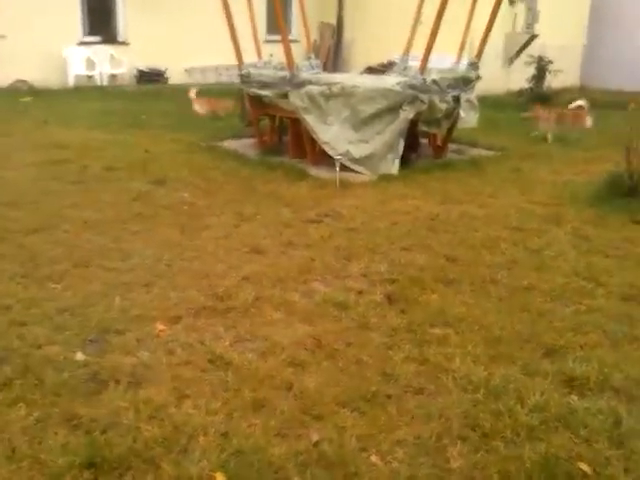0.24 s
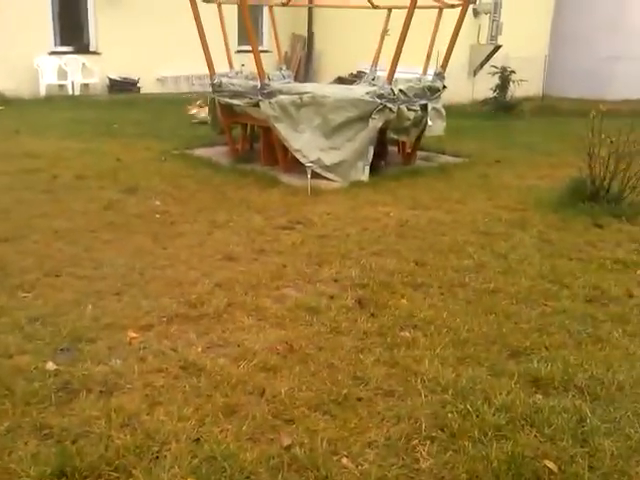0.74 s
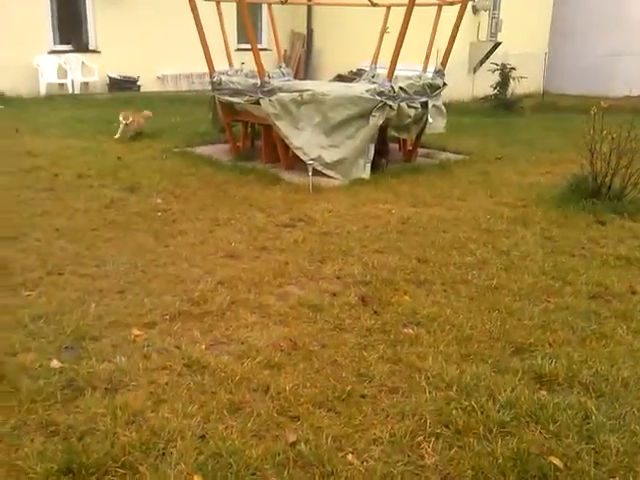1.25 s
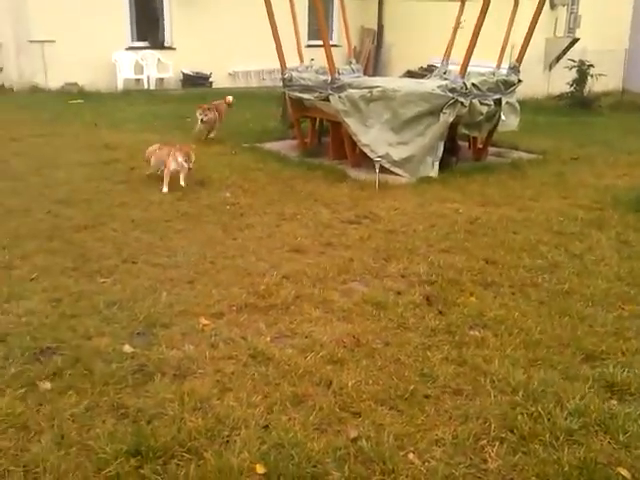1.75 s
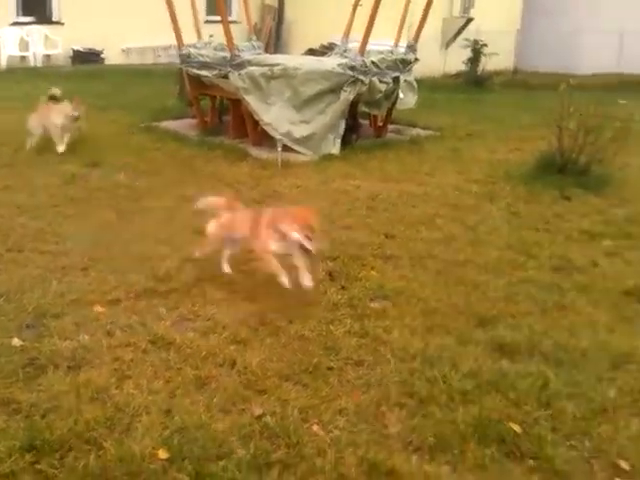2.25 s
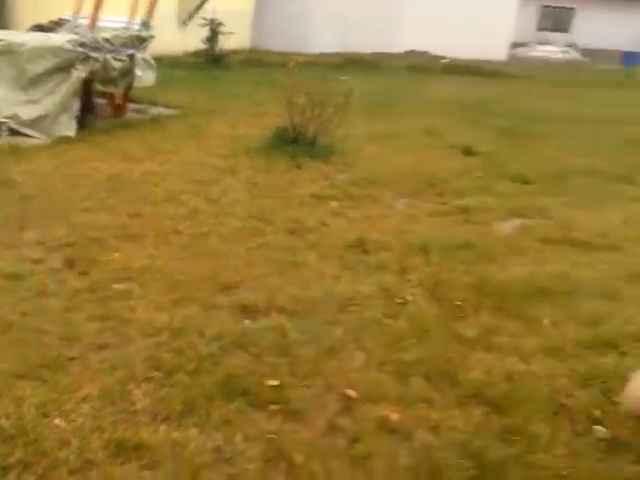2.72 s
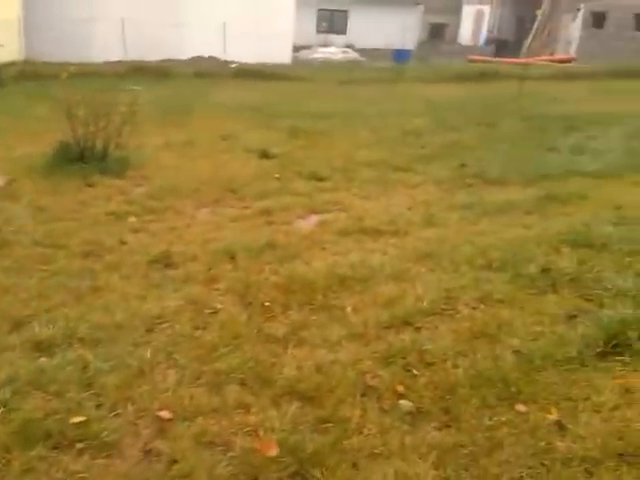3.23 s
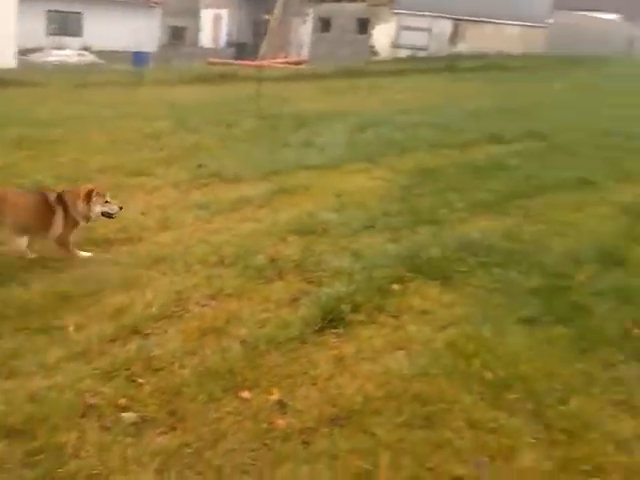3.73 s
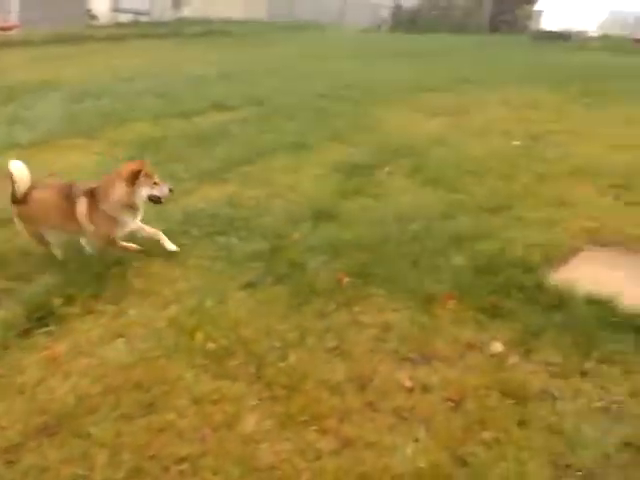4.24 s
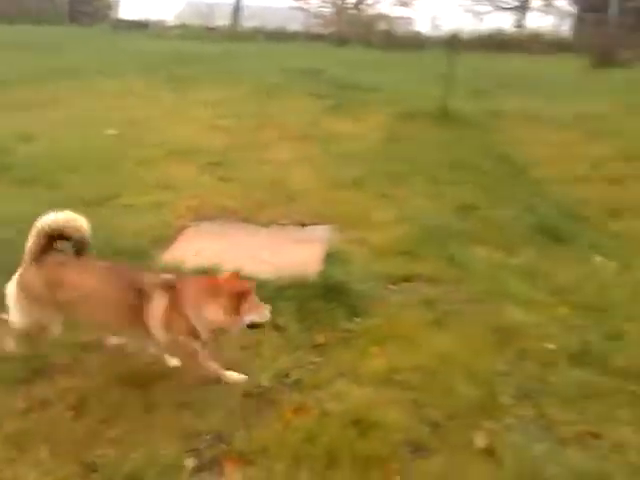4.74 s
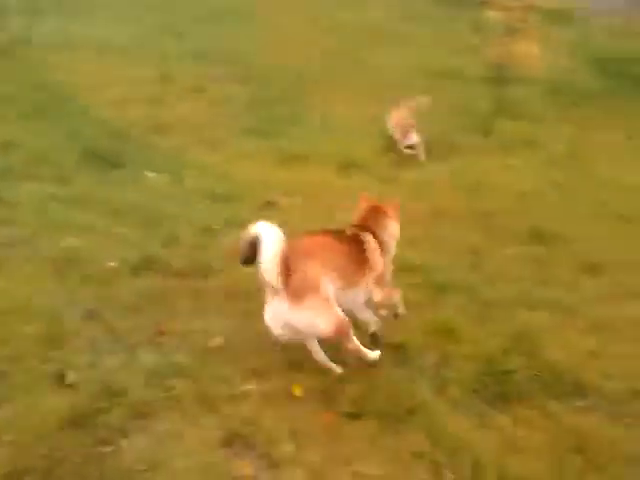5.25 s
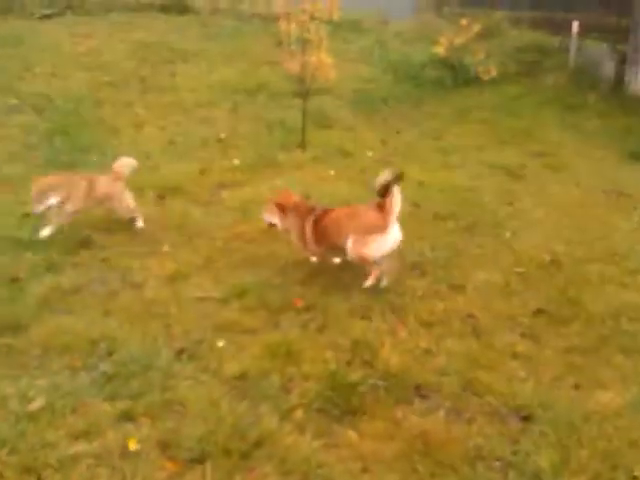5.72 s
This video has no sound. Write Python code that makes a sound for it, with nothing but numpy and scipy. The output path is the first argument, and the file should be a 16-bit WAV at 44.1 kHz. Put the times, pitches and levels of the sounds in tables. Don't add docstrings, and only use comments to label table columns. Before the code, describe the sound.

Two dogs race over a wet lawn, paws and legs crackling through grass with sharp snaps, soft thuds and panting, growing closer and busier.

```python
import sys
import numpy as np
from scipy import signal
from scipy.fft import rfft, irfft
from scipy.io import wavfile
from scipy.ndimage import uniform_filter1d

SR = 44100
rng = np.random.default_rng(int(sys.argv[2]) if len(sys.argv) > 2 else 0)


def file_out(sig):
    cols = np.atleast_2d(sig).T
    lim = np.clip(cols, -1, 1)
    pcm = np.round(lim * 32767).astype(np.int16)
    wavfile.write(sys.argv[1], SR, pcm)


def magnitude_from_level(level_db):
    exponent = np.asarray(level_db, float) / 20
    return 10 ** exponent


N = 263718


def evened(x):
    return x / np.sqrt(np.mean(x ** 2) + 1e-20)


def coloured(x, points):
    table_hz, table_db = np.transpose(points)
    hz = np.fft.rfftfreq(len(x), 1 / SR)
    gain = magnitude_from_level(np.interp(np.log(hz + 1), np.log(table_hz + 1), table_db))
    return evened(irfft(rfft(x) * gain, len(x)))


def curves(rows):
    s, *columns = np.transpose(rows)
    return [np.interp(np.arange(N) / SR, s, column) for column in columns]


def swells(rest_db, rows):
    t = np.arange(0, N, 44) / SR
    power = np.zeros(len(t))
    for peak_s, db, rise, fall in rows:
        away = np.maximum((peak_s - t) / rise, (t - peak_s) / fall)
        power += magnitude_from_level(2 * (db - 10 * away ** 1.5))
    return 10 * np.log10(magnitude_from_level(2 * rest_db) + np.interp(np.arange(N) / SR, t, power))


def resonate(x, hz, width):
    turn = np.exp(2j * np.pi * np.cumsum(hz * np.ones(len(x))) / SR)
    r = np.exp(-np.pi * width / SR)
    return 2 * (turn * signal.lfilter([1 - r], [1, -r], x / turn)).real


def resonate_twice(x, hz, width):
    return evened(resonate(resonate(x, hz, width), hz, width))


def drift(seconds):
    size = max(int(seconds * SR), 2)
    return evened(uniform_filter1d(uniform_filter1d(rng.standard_normal(N), size), size))


def crackle(per_s, spread_db, clump_db, hiss):
    size = magnitude_from_level(spread_db * np.minimum(rng.exponential(1, N), 4))
    size = size * (rng.random(N) < per_s / SR)
    breaks = evened(size * rng.choice([-1., 1.], N))
    return (breaks + hiss * rng.standard_normal(N)) * magnitude_from_level(clump_db * drift(.006))


def patchy(x, db, bins, frames):
    z = signal.stft(x, nperseg=256, noverlap=192)[2]
    field = rng.standard_normal(z.shape)
    field = uniform_filter1d(uniform_filter1d(field, bins, axis=0), frames, axis=1)
    return evened(signal.istft(z * magnitude_from_level(db * evened(field)), nperseg=256, noverlap=192)[1][:N])


def add(mix, s, sound):
    part = mix[max(round(s * SR), 0):][:len(sound)]
    part += sound[:len(part)]


# time_s, level_db
NEAR = [(0.0, -73.5), (0.06, -79.5), (0.66, -81), (0.8, -75.5), (1.3, -73.9), (1.75, -70.8), (2.39, -73.9),
        (2.5, -63.0), (3.25, -72.3), (4.2, -68.6), (4.8, -67.0), (5.03, -74.3), (5.98, -70.0)]
# peak_s, level_db, rise_10db_s, fall_10db_s,
# tips_db
SWEEPS = [(0.03, -67, 0.012, 0.012, -1), (0.772, -68.7, 0.1, 0.023, 1.7), (1.416, -66.5, 0.102, 0.07, -0.8),
          (1.534, -61.5, 0.016, 0.008, 4.9), (1.63, -58.2, 0.037, 0.023, 4.1),
          (1.88, -58.5, 0.045, 0.04, -3.5), (1.965, -67, 0.03, 0.02, -3), (2.026, -69.3, 0.012, 0.044, -6.4),
          (2.153, -54.0, 0.042, 0.026, -4.6), (2.228, -64.3, 0.015, 0.018, -9.0),
          (2.456, -59.5, 0.01, 0.012, 1.5), (2.487, -54.6, 0.024, 0.01, 1.9),
          (2.642, -52.4, 0.07, 0.06, -1.5), (2.754, -62.5, 0.089, 0.022, 4.2),
          (2.835, -64.9, 0.015, 0.09, 1.6), (2.905, -58, 0.012, 0.025, -3.1),
          (2.996, -64.2, 0.115, 0.182, 3.9), (3.134, -56.7, 0.164, 0.025, -9.0),
          (3.372, -60, 0.045, 0.088, -1.5), (3.412, -68, 0.3, 0.3, -1.5), (3.497, -61.9, 0.029, 0.012, 1.6),
          (3.688, -62.8, 0.061, 0.014, -2.3), (3.77, -65.5, 0.04, 0.025, 1.5),
          (3.827, -62.4, 0.034, 0.024, -2.7),
          (4.011, -63.3, 0.092, 0.163, -0.9), (4.29, -62, 0.098, 0.026, -1.2),
         (4.342, -56, 0.014, 0.03, -7.4), (4.5, -60.7, 0.023, 0.06, -3.7),
         (4.598, -56.0, 0.033, 0.022, -4.3), (4.684, -55.7, 0.068, 0.012, -1.8),
         (4.736, -59.8, 0.017, 0.017, -1.5), (4.856, -56.1, 0.023, 0.15, -1.0),
         (4.914, -50, 0.03, 0.018, -8), (5.07, -48, 0.022, 0.085, -3.1), (5.165, -53.5, 0.06, 0.085, -1),
         (5.296, -53.5, 0.032, 0.033, 2.5), (5.343, -56, 0.007, 0.012, 1.5), (5.395, -55, 0.015, 0.093, -5),
         (5.468, -52.8, 0.069, 0.027, 0.8), (5.54, -57.5, 0.025, 0.012, -1),
         (5.605, -55.0, 0.126, 0.048, 1.5), (5.722, -53, 0.05, 0.09, -5.3), (5.84, -60, 0.05, 0.02, 0.5),
         (5.884, -48.5, 0.006, 0.03, -7.5), (5.976, -55, 0.015, 0.05, -3.4),
          (1.432, -64, .02, .015, -2), (2.709, -63, .015, .015, 5), (2.958, -62, .012, .01, -8),
          (3.053, -64, .012, .012, 5), (3.302, -63, .012, .012, 2), (3.352, -58, .03, .015, -5),
          (3.956, -61, .015, .015, -5), (3.545, -66, .02, .02, -3), (4.151, -68, .012, .012, 5),
          (5.69, -53, .005, .018, -4), (4.262, -66, .025, .015, 4), (4.365, -55, .012, .015, -8),
          (4.405, -59, .03, .008, 1), (4.49, -58, .008, .015, -4), (4.54, -67, .012, .012, 3),
          (4.719, -62, .01, .01, -5), (4.836, -60, .008, .015, -6), (4.888, -56, .012, .015, 1),
          (4.932, -53, .01, .012, 1), (4.984, -58, .008, .02, 4), (5.313, -52, .015, .015, -1),
          (5.36, -58, .012, .006, 0.5), (5.493, -58, .015, .012, 3), (5.675, -54.5, .04, .01, -2),
          (5.742, -53, .015, .015, -2), (5.827, -57, .015, .015, -3), (5.857, -59, .012, .012, -3),
          (5.905, -52.5, .012, .035, -4.5), (5.425, -55, .02, .02, -3), (5.225, -60, .02, .012, 4)]


def leg_sweeps():
    sweeps = SWEEPS
    rest_db = curves(NEAR)[0]
    blades_db = swells(rest_db, [row[:4] for row in sweeps])
    tip_rows = [(s, db + tips_db, rise, fall) for s, db, rise, fall, tips_db in sweeps]
    return blades_db, swells(rest_db + 1.0, tip_rows)


# freq_hz, density_db
BLADES = [(300, -28), (1300, -12), (2300, -11), (3200, -10), (4000, -10), (6200, -11), (16000, -32)]
# freq_hz, density_db
TIPS = [(4000, -31), (6100, -13), (7200, -5), (8500, -11.5), (11000, -26), (16000, -44)]


def grass(blades_db, tips_db):
    blades = coloured(crackle(per_s=2200, spread_db=1.8, clump_db=2.0, hiss=0.7), BLADES)
    port = magnitude_from_level(19.3) * resonate(blades, hz=5080, width=540)
    blades = patchy(blades + port, db=1.9, bins=5, frames=24)
    tips = coloured(crackle(per_s=1000, spread_db=2.3, clump_db=2.4, hiss=0.6), TIPS)
    tips = patchy(tips, db=1.4, bins=7, frames=16)
    return magnitude_from_level(blades_db + 2.0) * blades + magnitude_from_level(tips_db + 0.5) * tips


# freq_hz, density_db
SOIL = [(30, -19), (90, -3.5), (200, -2), (320, 1.5), (450, -4.5), (800, -3.5), (1500, -35.5)]
# peak_s, level_db
GUSTS = [(0.0, -68), (.33, -65), (.65, -70), (1.0, -68), (1.55, -67), (1.8, -68), (2.15, -61), (2.48, -62),
         (2.9, -66), (3.3, -65), (3.58, -63), (3.9, -63), (4.86, -66), (5.13, -63), (5.5, -67), (5.9, -67)]


def ground(blades_db):
    stride_s, usual_sweep_db = .11, -62
    effort_db = uniform_filter1d(blades_db, int(stride_s * SR)) - usual_sweep_db
    weight_db = -67.7 + .45 * effort_db
    sod = coloured(crackle(per_s=400, spread_db=1.5, clump_db=1.3, hiss=1.5), SOIL)
    calm_db, gust_s = -80, .16
    buffet_db = swells(calm_db, [(s, db, gust_s, gust_s) for s, db in GUSTS])
    buffet = resonate_twice(rng.standard_normal(N), hz=55, width=60)
    return magnitude_from_level(weight_db) * sod + magnitude_from_level(buffet_db - 1.0) * buffet


# time_s, scuff_db, spray_db
SCUFF = [(0.0, -84, -86), (1.2, -80, -86), (1.42, -67, -84), (2.0, -69.5, -84), (2.3, -70, -84),
         (2.47, -67, -70), (2.64, -61.5, -74), (2.8, -72, -72), (2.95, -65.5, -68), (3.1, -73, -76),
         (3.85, -67, -82), (4.1, -74, -84), (4.7, -72, -80), (5.1, -64, -68), (5.24, -74, -80),
         (5.3, -80, -66), (5.65, -67, -70), (5.98, -67, -78)]
# freq_hz, density_db
PADS = [(250, -30), (500, -1), (1200, -1), (2800, -2), (4200, -12), (8000, -40)]
# freq_hz, density_db
SPRAY = [(7000, -30), (9000, -1), (11500, -3), (14000, -16), (16000, -30)]


def scuffing():
    scuff_db, spray_db = curves(SCUFF)
    pads = coloured(crackle(per_s=900, spread_db=2.2, clump_db=2.5, hiss=0.6), PADS)
    pads = patchy(pads, db=2.2, bins=4, frames=20)
    spray = coloured(crackle(per_s=550, spread_db=2.3, clump_db=4.5, hiss=0.3), SPRAY)
    return magnitude_from_level(scuff_db) * pads + magnitude_from_level(spray_db) * spray


# freq_hz, density_db
AIR = [(15, -47), (25, -3), (58, -4.5), (108, -13.5), (137, -8), (180, -13), (317, -13), (503, -16),
       (591, -23), (1190, -17.8), (1440, -18.2), (1840, -19.3), (6000, -22), (16000, -23.4)]


def air():
    level_db = -62.5 + 0.66 * drift(0.23)
    return magnitude_from_level(level_db) * coloured(rng.standard_normal(N), AIR)


# start_s, peak_db, length_ms, lowest_hz
STEMS = [(.3392, -33, 1.3, 3700), (1.9226, -43, 1.0, 3800), (2.6904, -39, .7, 3810),
         (2.801, -46, 1.6, 4300), (3.0909, -29, 1.2, 1350), (3.1222, -39, .7, 3160), (3.388, -35, .7, 2500),
         (3.4435, -35, 1.2, 1200), (3.451, -42, .7, 3070), (3.7695, -48, 1.3, 3950), (4.143, -46, .7, 3860),
         (4.2232, -45, .7, 2580)]
# start_s, peak_db, length_ms
DROPS = [(.3484, -41, 1.0), (.3588, -45, 1.0), (1.9186, -33.5, .7), (2.9041, -30, 1.1), (2.9057, -31, 1.0),
         (3.645, -41, 1.0), (3.6464, -46, 1.1), (3.7643, -41, 1.4), (3.9437, -46, 1.2), (4.3055, -38, 1.0),
         (4.307, -43.5, 1.0), (4.3149, -45, 1.0), (4.34, -42, 2.0), (4.9779, -32, 1.7), (5.1964, -42, 1.5),
         (5.3438, -36.5, 1.4), (5.5434, -40, 1.0), (5.5818, -37, 1.3), (5.689, -41, 2.4),
         (5.7125, -39, 1.2), (5.7208, -35, 1.7), (5.8666, -42, 1.3), (2.4528, -46, 1.0), (2.4748, -41, 1.4),
         (2.5573, -45, 1.0), (2.8736, -50, 1.0), (2.8976, -46, 1.0), (2.9612, -49, 1.0), (3.1327, -44, 1.5),
         (3.3589, -46, 1.3), (3.8138, -49, 1.0), (3.9528, -48, 1.0), (3.9634, -49, 1.0), (4.3251, -48, 1.0),
         (4.3355, -47, 1.0), (4.364, -43, 1.4), (4.3982, -48, 1.0), (4.4935, -47, 1.0), (4.5555, -50, 1.0),
         (4.584, -43, 1.4), (4.7169, -49, 1.2), (4.8369, -46, 1.0), (4.9535, -44, 1.5), (5.3616, -47, 1.0),
         (5.5758, -44, 1.3), (5.7405, -41, 1.6), (5.9734, -42, 1.6)]
# start_s, peak_db, length_ms
TEARS = [(1.3723, -47, .7), (1.5353, -41, 1.4), (1.6982, -42, 1.4), (2.482, -38, .7), (2.5892, -34, .9),
         (3.0024, -42.5, .9), (3.1124, -37, 1.3), (3.6774, -35, 1.3), (4.0253, -43, .8), (4.4887, -45, 1.2),
         (4.6602, -41, 1.0), (4.6671, -35, 2.2), (4.7927, -45, .7), (5.1277, -38, 1.0), (5.1502, -37, .7),
         (5.1783, -31, 1.7), (5.1956, -40, .7), (5.386, -36, 1.2), (5.8793, -36, 1.2), (2.611, -39, 1.2),
         (4.9308, -37, 1.2)]
# start_s, peak_db
TICKS = [(.7027, -49), (1.8478, -41), (3.293, -46), (3.5009, -41), (3.9304, -40.5), (4.006, -43),
         (4.0076, -41), (4.0141, -43), (4.6576, -37), (4.689, -40), (4.7313, -37), (4.7341, -32),
         (4.7345, -39), (5.0735, -38), (5.2227, -40), (5.2947, -40), (5.3399, -39), (2.4798, -42),
         (2.8594, -47), (4.6229, -44), (4.9267, -39), (5.0145, -43), (5.5219, -45), (5.6236, -41),
         (2.262, -50)]
# start_s, peak_db, lowest_hz, highest_hz
BAND_SNAPS = [(.3389, -42, 5300, 7500), (1.4113, -51, 6500, 9000), (2.9045, -42, 8500, 13000),
              (2.8011, -47, 5000, 8500), (3.0924, -36.5, 1300, 3700), (5.1968, -39, 5500, 6300),
              (3.102, -44, 5500, 7300), (3.2973, -47, 6500, 8500), (3.444, -40, 3500, 6000),
              (4.1445, -50, 6500, 9000), (2.7327, -44, 8000, 12500), (4.2257, -45, 6800, 8600),
              (4.4057, -47, 7000, 9000), (4.6313, -48, 6500, 9000), (4.7387, -46, 7000, 10500),
              (4.811, -46, 900, 4500), (4.9507, -39, 6500, 9500), (5.0261, -49, 6500, 9000),
              (1.9187, -41, 3500, 4800), (5.1792, -36, 6500, 7800), (5.2617, -36, 7200, 10500),
              (5.5396, -46, 6500, 9000), (5.7784, -48, 6500, 9000), (5.8432, -46, 6500, 8500)]


def snaps():
    # start_s, peak_db, length_ms, lowest_hz, highest_hz, bright_db
    rows = [(*stem, 5050, -15) for stem in STEMS]
    rows += [(*drop, 4600, 5650, -13) for drop in DROPS]
    rows += [(*tear, 4350, 5850, -4) for tear in TEARS]
    rows += [(*tick, .8, 4300, 6050, 7) for tick in TICKS]
    rows += [(s, db, 1.1, low_hz, high_hz, -18) for s, db, low_hz, high_hz in BAND_SNAPS]
    out, t = np.zeros(N), np.arange(600) / SR
    chance = rng.random((len(rows), 28))
    for (s, db, ms, low_hz, high_hz, bright_db), c in zip(rows, chance):
        onset = 1 - np.exp(-(t / (ms * 0.00059)) ** 2)
        wet_tail = 0.055 * np.exp(-t / .004)
        shape = onset * (np.exp(-(t / (ms * 0.0014)) ** 2) + wet_tail)
        band = max(high_hz - low_hz - 550 / ms, 250)
        body_hz = (low_hz + high_hz) / 2 + band * 1.2 * (np.arange(7) + .5 * c[:7] - 3.25) / 7
        tick_hz = 6500 + 620 * (np.arange(7) + c[7:14])
        scatter = (250 / (band + 400) + .12) * c[14:, None]
        phase = np.outer(np.r_[body_hz, tick_hz], t - ms * .0005) + scatter
        partials = shape * np.sin(2 * np.pi * phase)
        body = partials[:7].sum(0)
        tick = magnitude_from_level(-3.4 * np.arange(7)) @ partials[7:]
        burst = evened(body) + magnitude_from_level(bright_db + 2.0) * evened(tick)
        add(out, s - ms * .0002, magnitude_from_level(db + 2.17) * burst / abs(burst).max())
    return out


# centre_s, length_s, breath_db, mouth_hz
PANT = [(.75, .04, -70, 696), (1.422, .05, -64, 2450), (1.96, .052, -70, 1950), (1.614, .091, -68, 760),
        (1.64, .07, -67, 2100), (1.885, .055, -64.5, 2200), (5.72, .08, -59.5, 3500),
        (2.153, .064, -60.5, 1340), (2.153, .064, -58, 3680), (2.139, .05, -62, 2280),
        (2.56, .05, -65, 1900), (2.643, .12, -57.5, 1750), (2.785, .04, -68, 1850), (3.068, .04, -66, 1530),
        (3.166, .043, -65, 1440), (3.346, .06, -66.5, 1720), (3.637, .077, -69, 1800),
        (3.995, .08, -71, 1500), (4.138, .06, -68, 1380), (4.292, .042, -62, 1580),
        (4.515, .038, -63.5, 1550), (4.592, .055, -59.5, 1470), (4.675, .055, -64, 2670),
        (4.906, .083, -55, 2520), (5.084, .055, -58, 3160), (5.451, .063, -57, 1310),
        (5.477, .054, -55, 2460), (5.79, .1, -65, 1340), (5.912, .04, -56.5, 1230),
        (5.902, .04, -57.5, 1650), (2.479, .03, -66, 1400), (2.589, .02, -61, 2800), (2.63, .03, -60, 2500),
        (5.81, .03, -64, 2700), (4.348, .03, -59, 4500), (2.819, .03, -67, 1600), (1.885, .045, -62, 4600),
        (3.083, .02, -60, 1500), (4.915, .035, -54, 4750), (3.467, .02, -65, 1500), (3.682, .02, -63, 2800),
        (5.052, .025, -64, 1400), (4.884, .03, -61, 1850), (4.984, .025, -64, 2550),
        (5.388, .025, -61, 3200), (5.423, .03, -61, 1300), (5.423, .025, -61, 2900),
        (5.483, .03, -60, 1500), (5.662, .03, -62, 2300)]


def panting():
    out, breath = np.zeros(N), rng.standard_normal((len(PANT), 12000))
    for (s, length, db, low_hz), noise in zip(PANT, breath):
        high_hz = low_hz + 1250
        low = resonate_twice(noise, low_hz, 380)
        high = resonate_twice(noise, high_hz, 460)
        skirt = resonate_twice(noise, (low_hz + high_hz) / 2, 5000)
        u = abs(np.arange(12000) - 6000) / SR / (length * 0.41)
        puff = np.exp(-u ** 1.7) * (low - magnitude_from_level(-5) * high + magnitude_from_level(-1) * skirt)
        add(out, s - 6000 / SR, magnitude_from_level(db) * puff)
    return out * magnitude_from_level(1.3 * drift(.004))


# peak_s, peak_db, pitch_hz
PAWS = [(2.172, -53, 354), (2.265, -52.5, 242), (2.455, -47, 320), (2.473, -53, 110), (2.488, -42.5, 215),
        (2.496, -47, 130), (2.612, -40.5, 265), (2.789, -46.5, 260), (3.094, -47, 360), (3.126, -48.5, 336),
        (3.394, -52, 285), (3.446, -41.5, 386), (3.467, -52, 331), (4.605, -52, 337), (4.632, -51, 313),
        (4.673, -49, 241), (4.863, -47, 203), (4.986, -45.5, 250), (5.078, -46, 238), (5.111, -47.5, 203),
        (5.151, -48.5, 190), (5.339, -49.5, 274), (5.419, -46, 340), (5.643, -46.5, 276), (5.715, -43, 430),
        (5.834, -48, 239), (5.868, -49, 318), (5.972, -46, 337),
        (1.741, -57, 210), (1.983, -58, 174), (2.245, -56.5, 304), (3.204, -54.5, 190), (3.686, -57, 205),
         (3.809, -58, 144), (4.493, -54, 267), (4.814, -55, 420), (5.503, -54, 308), (5.698, -58, 279),
         (1.847, -55, 300), (2.531, -52, 420), (2.751, -54, 280), (2.953, -55, 330), (3.525, -53, 340),
         (3.633, -54, 280), (3.822, -55, 310), (4.552, -55, 300), (4.942, -52, 430), (3.387, -51, 620),
         (4.85, -50, 650), (5.492, -51, 650), (1.451, -53, 620), (2.483, -52, 650), (5.844, -53, 620)]


def paws():
    out, t = np.zeros(N), np.arange(2500) / SR
    for s, db, hz in PAWS:
        u = t * hz
        turns = 0.69 * u + .6 * (1 - np.exp(-u / 0.37))
        shudder = .16 * np.exp(-u / 1.5)
        push = u / 0.47 * (np.exp(1 - u / 0.52) + shudder) * np.sin(2 * np.pi * turns)
        add(out, s - 0.623 / hz, magnitude_from_level(db - 2.8) * push)
    return out


# peak_s, peak_db, push_ms
THUMPS = [
    (3.5725, -45, 2.0),
    (3.397, -53, 2.2),
    (3.812, -51, 2.8),
    (3.247, -56, 2.2),
    (2.716, -57, 2),
    (5.455, -54, 2),
    (5.637, -56, 2),
    (1.95, -58, 2),
    (3.947, -57, 2.2),
    (3.655, -53, 1.5),
]


def thumps():
    out, t = np.zeros(N), np.arange(1600) / SR - .01
    for s, db, ms in THUMPS:
        u = t * 1000 / ms
        rebound = .45 * np.exp(-((u - 2.6) / 1.6) ** 2)
        add(out, s - .01, magnitude_from_level(db) * (np.exp(-u ** 2) - rebound))
    return out


def grunt():
    start_s, length_s, peak_db, pitch_hz = 5.437, .062, -47.5, 310
    t, out = np.arange(int(length_s * SR)) / SR, np.zeros(N)
    waver = 0.14 * drift(0.0058)[:len(t)]
    turns = np.cumsum(pitch_hz * (1.04 - .1 * t / length_s + waver)) / SR
    voice = np.sin(2 * np.pi * turns) + magnitude_from_level(-14) * np.sin(4 * np.pi * turns)
    add(out, start_s, magnitude_from_level(peak_db) * np.hanning(len(t)) * voice)
    return out


def scene():
    blades_db, tips_db = leg_sweeps()
    lawn = grass(blades_db, tips_db) + ground(blades_db) + scuffing() + air() + snaps()
    dogs = panting() + paws() + thumps() + grunt()
    return (lawn + dogs)[None]


def top_cut(x):
    return signal.sosfilt(signal.butter(12, 16400, fs=SR, output="sos"), x)


def record(dry):
    edge = signal.firwin(601, 15800, window=("kaiser", 9), fs=SR)
    mix = signal.oaconvolve(dry, edge[None], "same") - .0033
    return top_cut(mix)


dry = scene()
out = record(dry)
file_out(out)
```